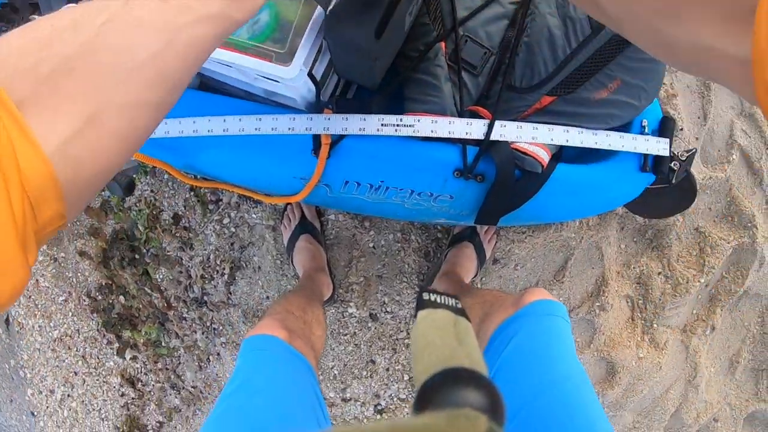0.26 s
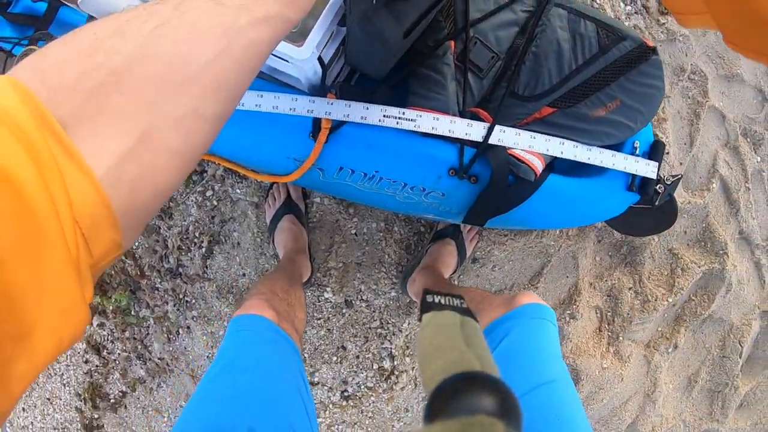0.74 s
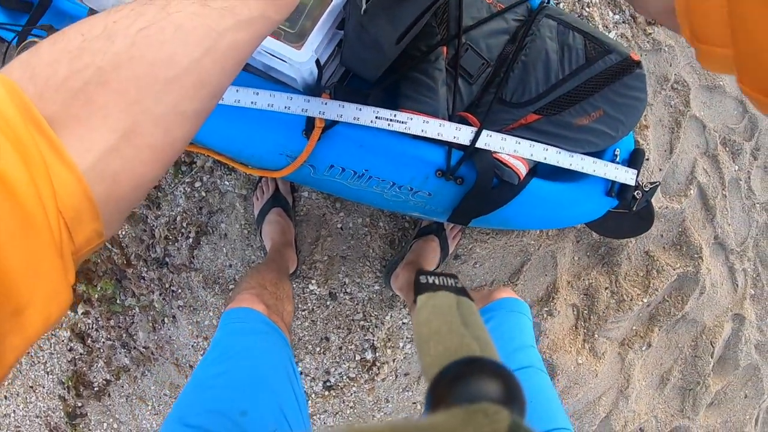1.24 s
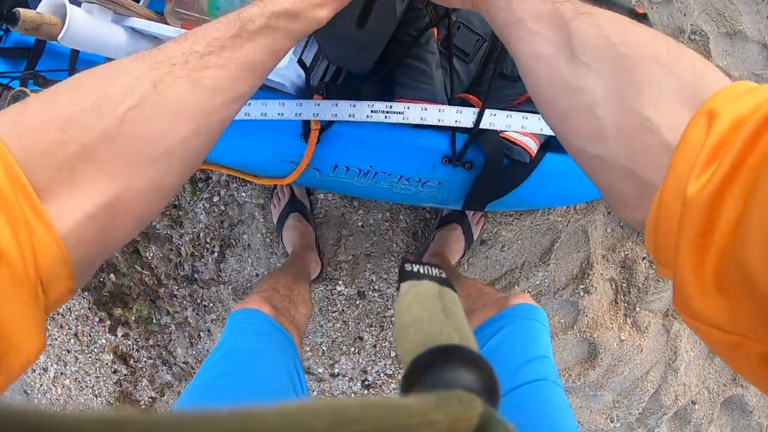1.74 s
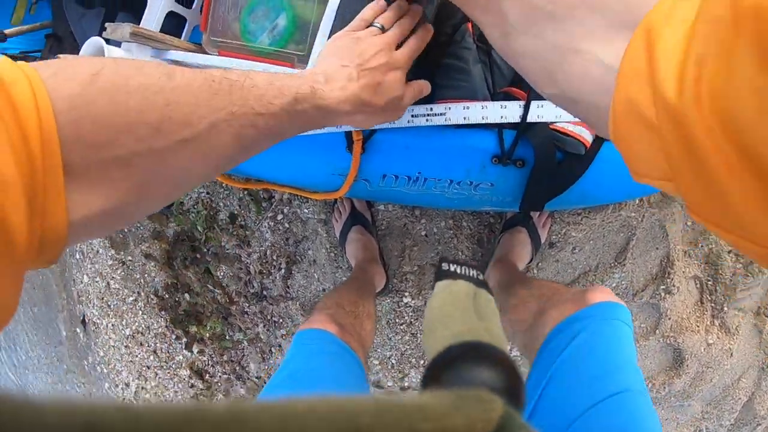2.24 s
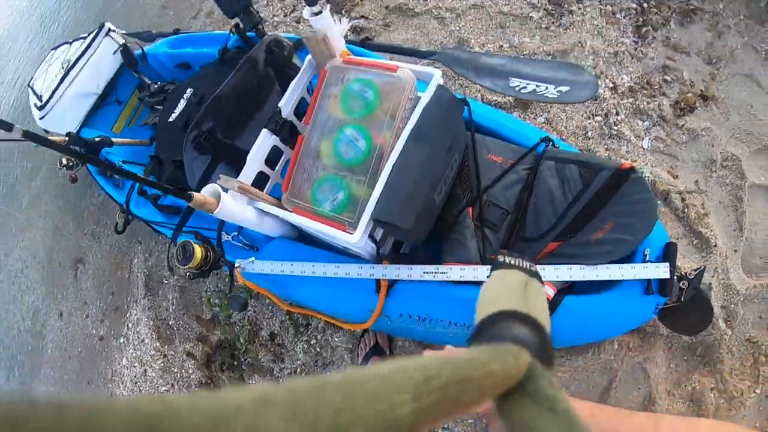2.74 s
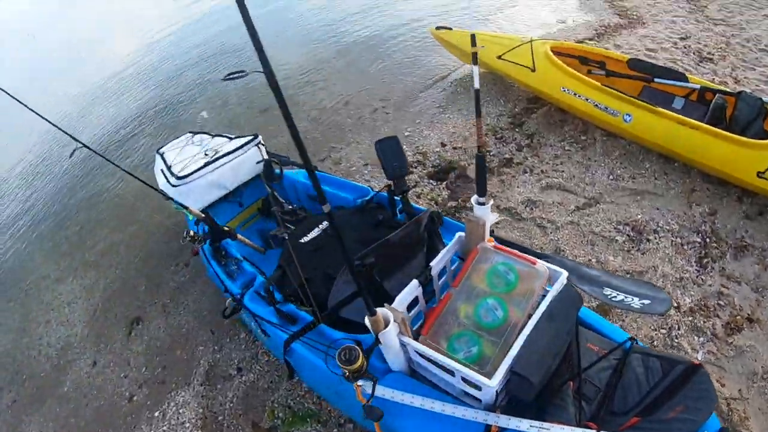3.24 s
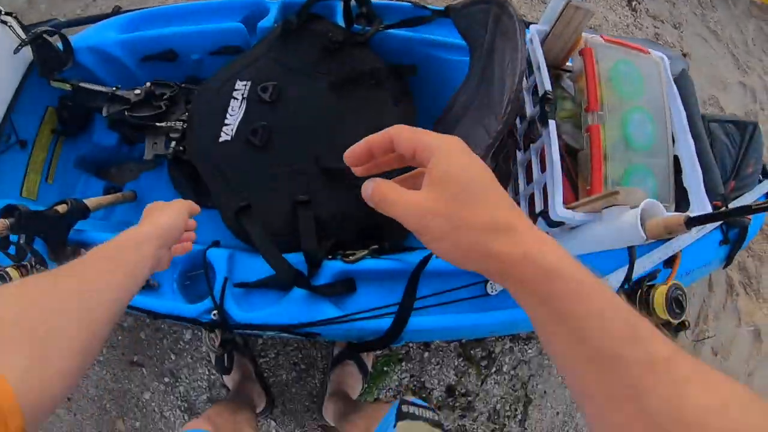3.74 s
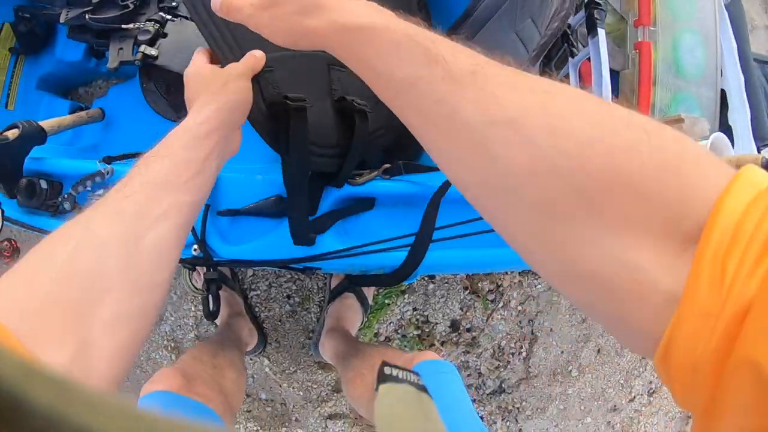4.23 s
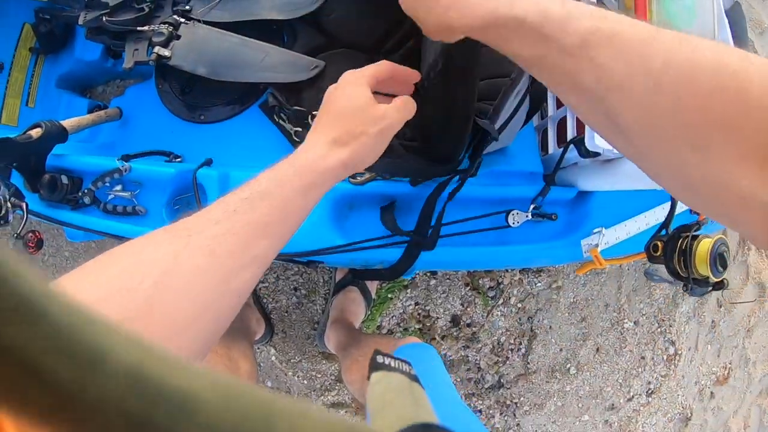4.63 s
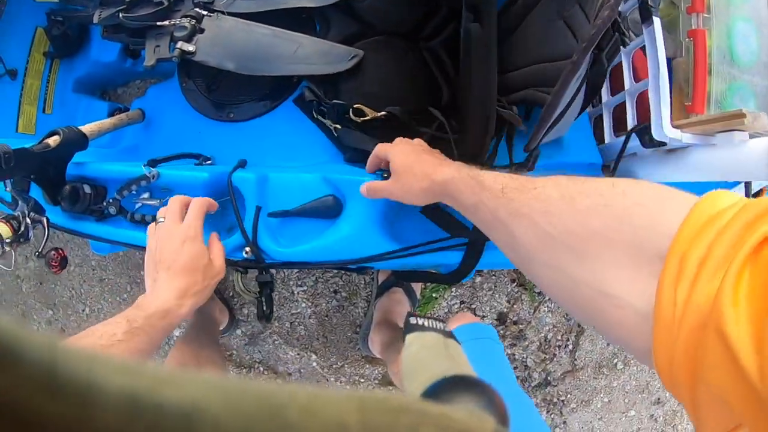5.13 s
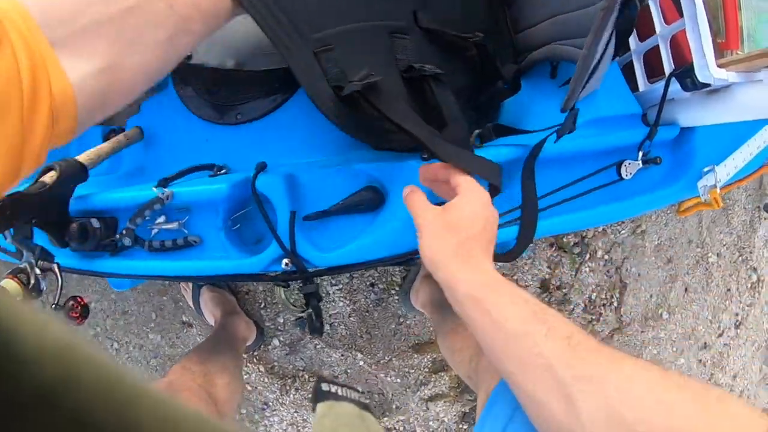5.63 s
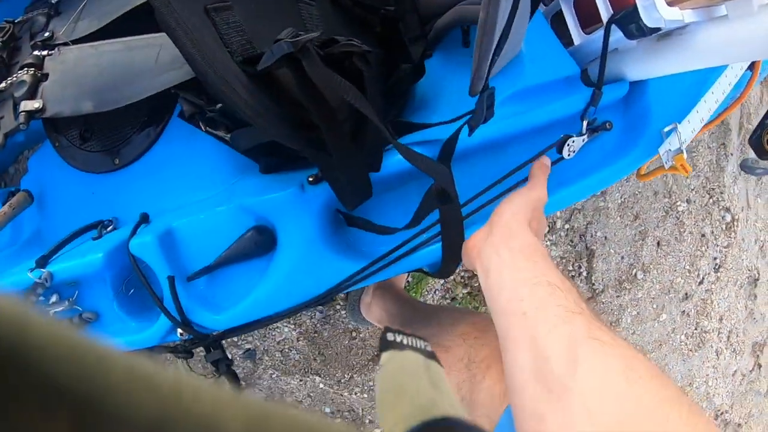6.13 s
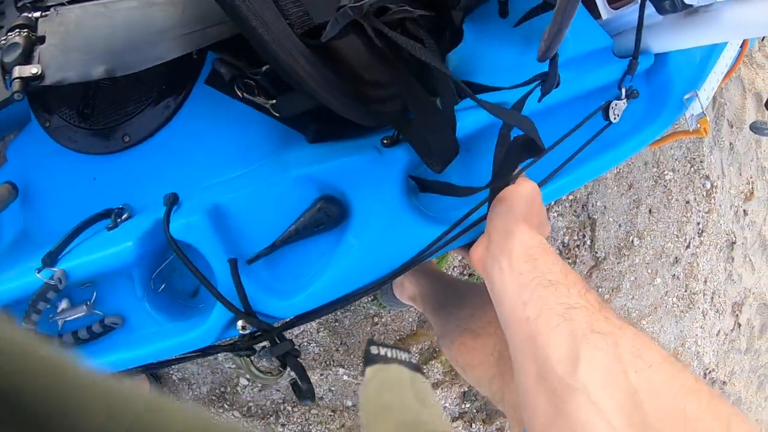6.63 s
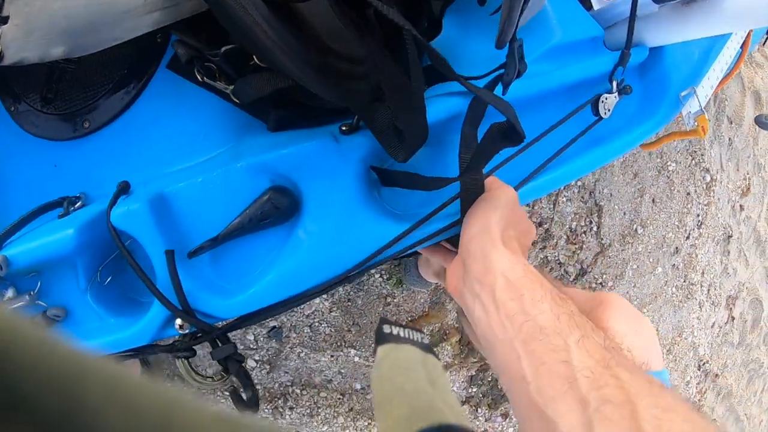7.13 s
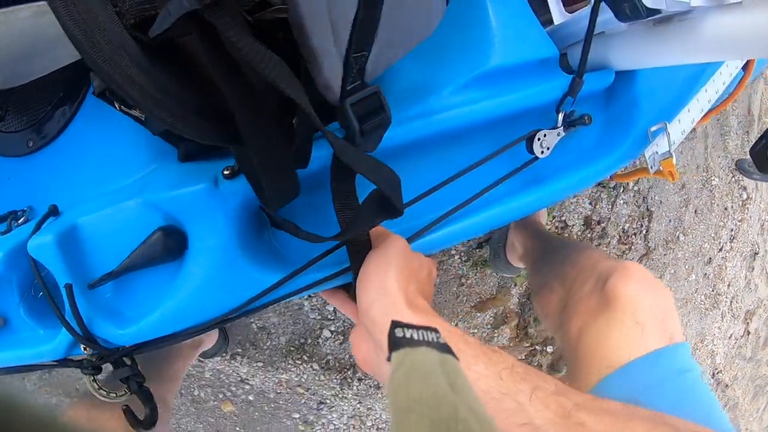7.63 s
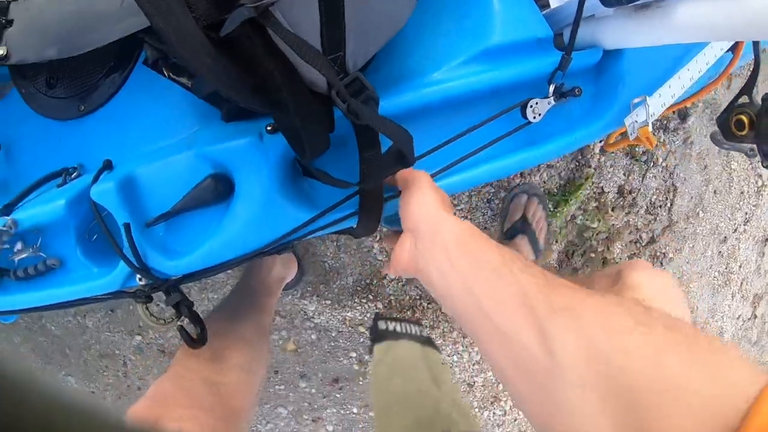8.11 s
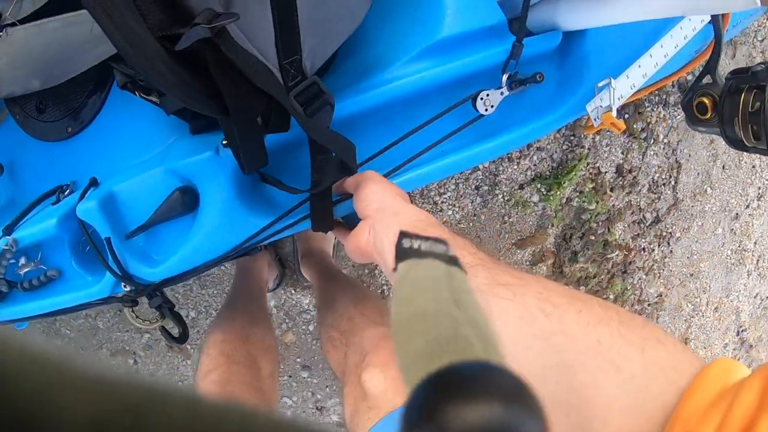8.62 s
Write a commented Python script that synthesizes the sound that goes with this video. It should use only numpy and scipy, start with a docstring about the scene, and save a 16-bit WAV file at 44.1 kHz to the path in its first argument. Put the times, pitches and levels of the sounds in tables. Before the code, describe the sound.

Outdoors by quiet water, a wearer's microphone catches hands rummaging with gear on a hollow plastic hull. Buckles tick, metal clips shake and ring, a hard knock lands, then things quieten with thin faint whistles. Bag cloth and straps rub and thump in the middle. Finally the boat drags over coarse sand with a booming, gritty scrape, ending in small rubs and a knock. Soft wind and shore hush underneath.

```python
"""A loaded plastic kayak on a gravelly beach, heard through a head-worn housing with two microphone ports.
From the start hands knock, snap and brush at hull and seat cloth (noise and damped modes); a strap creaks.
Around 1.2 s shaken metal clips jingle (ringing modes); thin whistles follow; from 3.5 to 6.9 s a far motor hums.
From 6.6 to 8.2 s the hull slides over sand (grainy noise through shell, deck and surface), then handling resumes.
Light wind and the hush of the shore (filtered noise) lie under it all."""
import sys
import numpy as np
from scipy import signal
from scipy.fft import rfft, irfft, next_fast_len
from scipy.io import wavfile
from scipy.ndimage import uniform_filter1d

SR = 44100
rng = np.random.default_rng(int(sys.argv[2]) if len(sys.argv) > 2 else 0)


def inscribe(sig):
    """Save sig as 16-bit PCM at rate SR to the path in sys.argv[1].

    A 1-D sig is mono; a 2-D sig holds one channel per row.
    Samples are clipped to [-1, 1] before scaling.
    """
    pcm = np.round(np.clip(np.atleast_2d(sig).T, -1, 1) * 32767)
    wavfile.write(sys.argv[1], SR, pcm.astype(np.int16))


N = 391166

# hull dragged over sand [t/s, level/dB, grain fineness 0 coarse .. 2 finest]
SLIDE = [(6.6, -53, 0.24), (6.756, -33, 0.84), (6.794, -28.5, 0.26), (7.064, -19, 0.39), (7.56, -19, 0.37),
         (7.568, -17.5, 0.27), (7.902, -20.5, 0.63), (7.96, -26, 0.38), (8.07, -45.5, 0.46),
         (8.16, -91, 0.3)]
SLIDE_BOOM_DB, SLIDE_DECK_DB, SLIDE_GRAINS_DB = -2, -7.5, -10.5  # added to the slide's level
# load never quite at rest [t/s, shell level/dB, surface level/dB, grain fineness 0..2]
STIR = [(0, -56, -57, 0.49), (.5, -55, -57, 0.88), (.9, -56, -54, 1.4), (1.3, -75, -50, 1.8),
        (1.5, -65, -55.5, 0.57), (1.59, -58, -65, 0.47), (1.7, -49, -59.5, 1.1), (2.07, -46, -59, 0.7),
        (2.5, -58, -49, 0.83), (2.8, -54.5, -55, 0.64), (3.55, -60.5, -51, 0.14), (4.3, -48.5, -55, 0.76),
        (4.63, -42.5, -62, 0.92), (4.72, -55, -68, 0.9), (5.1, -43, -41, 0.27), (5.6, -45, -54, 0.45),
        (5.78, -60, -44, 0.71), (6.4, -42.5, -48, 0.47), (6.7, -42.5, -49.5, 0.62), (8.1, -47, -52.5, 1.43),
        (8.5, -55, -52, 0.87), (8.87, -37, -51, 0.66)]
STIR_DECK_DB = -13.5  # added to the shell level
# gear and hands scraping the hull, through the shell [peak t/s, rise/s, fall/s, boom level/dB, deck level/dB]
SCRAPES = [(0.005, .03, 0.016, -36, -51), (.136, 0.18, 0.018, -42.5, -58), (.3, 0.39, 0.09, -48.5, -57),
           (.43, 0.21, 0.027, -46.5, -47.5), (.55, 0.037, 0.41, -39.5, -60), (.95, 0.072, 0.53, -43, -71),
           (1.205, 0.01, 0.089, -35.5, -43), (1.365, 0.0069, 0.091, -39, -63),
           (1.515, 0.033, 0.18, -37, -60), (1.65, 0.059, 0.04, -38.5, -65), (1.76, 0.054, 0.16, -40, -51),
           (1.95, 0.085, 0.39, -39.5, -50.5), (2.2, 0.079, 0.28, -44, -50),
           (2.354, 0.083, 0.066, -34.5, -67), (2.6, 0.42, 0.19, -44.5, -54.5),
           (2.78, 0.067, 0.09, -51, -61), (3.33, 0.11, 0.17, -55, -57), (3.7, 0.052, 0.42, -44, -51.5),
           (4.246, 0.053, 0.024, -39, -45), (4.376, 0.047, 0.084, -35, -33.5),
           (4.522, 0.073, 0.082, -31.5, -31), (4.58, 0.023, 0.027, -30.5, -48),
           (4.71, 0.14, 0.23, -41.5, -66), (4.87, 0.048, 0.093, -34.5, -41), (5.03, 0.1, 1, -57, -45.5),
           (5.33, 0.078, 0.069, -34, -43), (5.46, 0.036, 0.11, -34, -36), (5.58, 0.1, 0.25, -37.5, -45),
           (5.941, 0.031, 0.04, -32, -35.5), (6.07, 0.35, 0.14, -40.5, -44), (6.5, 0.058, 0.07, -34, -39),
           (6.58, 0.065, 0.027, -38, -46), (8.01, 0.041, 0.03, -26, -62), (8.27, 0.2, 0.044, -48.5, -53.5),
           (8.38, 0.041, 0.086, -39.5, -46), (8.54, 0.019, 0.2, -41.5, -54),
           (8.745, 0.058, 0.073, -28, -38)]
# cloth, straps, feet sweeping past, heard directly [peak t/s, rise/s, fall/s, level/dB, grain fineness from 0]
SWEEPS = [(.125, 0.035, 0.023, -51.5, 1.5), (.41, 0.18, 0.14, -50.5, 0.91), (.57, 0.072, 0.22, -52, 1),
          (.75, 0.046, 0.23, -45.5, 0.14), (1.02, 0.04, 0.013, -32.5, 1.1), (1.1, 0.19, 0.1, -44, 1.2),
          (1.23, 0.026, 0.035, -31.5, 1.5), (1.44, 0.034, 0.017, -42, 1.8),
          (1.638, 0.021, 0.034, -43, 0.17), (1.88, 0.29, 0.16, -52, 0.13), (2.0, 0.11, 0.22, -49, 0.83),
          (2.2, 0.046, 0.094, -50.5, 0.61), (2.33, 0.085, 0.039, -49.5, 0.88),
          (2.46, 0.11, 0.1, -41.5, 1.26), (2.58, 0.13, 0.075, -43, 1.1), (3.08, 0.068, 0.085, -56.5, 1.9),
          (3.41, 0.21, 0.052, -43, 0.6), (3.71, 0.061, 0.098, -29, 0.72), (3.89, 0.12, 0.053, -46, 0.96),
          (4.31, 0.033, 0.34, -49.5, 0.1), (4.426, 0.008, 0.095, -37, 0.31),
          (4.508, 0.12, 0.091, -31.5, 0.12), (4.68, 0.018, 0.03, -40.5, 0.62),
          (4.769, 0.11, 0.021, -42, 0.88), (4.84, 0.079, 0.41, -42, 0.9), (5.05, 0.092, 0.083, -36, 0.71),
          (5.33, 0.12, 0.041, -43, 0.089), (5.49, 0.14, 0.14, -38, 0.52), (5.58, 0.022, 0.033, -29, 0.63),
          (5.7, 0.23, 0.044, -41.5, 0.57), (5.83, 0.027, 0.33, -44, 0.9), (6.25, 0.12, 0.078, -38, 0.15),
          (6.36, 0.11, 0.021, -42, 0.16), (6.49, 0.07, 0.061, -46.5, 0.42), (6.59, 0.037, 0.04, -39.5, 0.1),
          (8.05, 0.12, 0.04, -38, 1.1), (8.18, 0.14, 0.23, -39.5, 3.3), (8.37, 0.023, 0.2, -45, 1.2),
          (8.5, 0.12, 0.12, -43, 0.91), (8.75, 0.13, 0.06, -44.5, 0.65), (8.831, 0.012, 0.015, -39.5, 0.17)]
# boom of the hollow shell [f/Hz, level/dB per Hz]
HULL_BOOM = [(29, -41), (50, -9), (108, -2.5), (140, -6), (211, -3.5), (296, -5.5), (480, -13), (620, -37),
             (1060, -120)]
# stiffer deck panels [f/Hz, level/dB per Hz]
DECK_PANELS = [(250, -6), (430, -3), (590, 4), (668, 0), (852, -6), (1030, -3.5), (1150, -5.5), (1500, -17),
               (2530, -120)]
# coarse sand and cloth [f/Hz, level/dB per Hz]
COARSE_GRAINS = [(620, -10), (1050, 6), (1170, 4), (1530, 6), (1850, 2.5), (2020, 3.5), (2400, -7.5),
                 (2600, -24), (3380, -100)]
# finer grains [f/Hz, level/dB per Hz]
FINE_GRAINS = [(1470, -21), (2500, -5.5), (3130, -4), (4900, -17), (6370, -22.5), (10800, -120)]
# finest grains [f/Hz, level/dB per Hz]
FINEST_GRAINS = [(2530, -19), (4300, -8.5), (5220, -6), (8800, -8.5), (10400, -8.5), (11100, -15.5),
                 (12000, -10.5), (13900, -15.5), (15400, -22), (16200, -65)]
# loaded keel's colour on the slide [f/Hz, gain/dB]
KEEL = [(100, 2), (690, -2), (850, 5), (1100, -1), (1530, 1), (1800, 1.5), (2400, -2), (3000, -0.5),
        (5500, -1), (16000, 0.5)]
GRAIN_SPREAD_DB = 5.5  # loss one grain size away from the fineness


def rubbing():
    """Stick and slip: slow jolts sound in shell and deck, small grains hiss."""
    t = np.arange(N) / SR
    outside_s = np.maximum(np.maximum(SLIDE[0][0] - t, t - SLIDE[-1][0]), 0)
    slide_db = along(SLIDE, 1) - 200 * outside_s
    shell_db, surface_db = along(STIR, 1), along(STIR, 2)
    scrapes, sweeps = np.array(SCRAPES), np.array(SWEEPS)

    drag = grains(per_s=130, spread_db=0.86, grain_s=0.017, steady=0.64)
    boom = evened(colour(drag, HULL_BOOM)) * amp(slide_db + SLIDE_BOOM_DB)
    # a loose load knocks more than it drags
    bumps = grains(per_s=70, spread_db=3.8, grain_s=0.017, steady=0.3)
    boom = boom + evened(colour(bumps, HULL_BOOM)) * pressure([shell_db], scrapes, scrapes[:, 3])

    jolts = grains(per_s=200, spread_db=2.8, grain_s=0.004, steady=1.3)
    panels = evened(colour(patchy(jolts, 1.6), DECK_PANELS))
    deck = panels * pressure([shell_db + STIR_DECK_DB], scrapes, scrapes[:, 4])
    dragged = panels * amp(slide_db + SLIDE_DECK_DB)

    sand = patchy(grains(per_s=600, spread_db=2.7, grain_s=0.0018, steady=1.1), 1.9)
    hiss = 0
    for size, spectrum in enumerate([COARSE_GRAINS, FINE_GRAINS, FINEST_GRAINS]):
        sifted = evened(colour(sand, spectrum))
        stir_db = surface_db + size_loss_db(size, along(STIR, 3))
        sweep_db = sweeps[:, 3] + size_loss_db(size, sweeps[:, 4])
        hiss = hiss + sifted * pressure([stir_db], sweeps, sweep_db)
        slid_db = slide_db + SLIDE_GRAINS_DB + size_loss_db(size, along(SLIDE, 2))
        dragged = dragged + sifted * amp(slid_db)
    return boom + deck + hiss + colour(dragged, KEEL)


def size_loss_db(size, fineness):
    """A grain size sounds weaker the further it lies from the wanted fineness."""
    return -GRAIN_SPREAD_DB * (size - fineness) ** 2


def pressure(steady_db, strokes, levels_db):
    """Gain over time of one layer: steady parts and strokes add in power."""
    power = np.zeros((1, N + SR))  # half a second of margin at each end
    for (peak_s, rise_s, fall_s), db in zip(strokes[:, :3], levels_db):
        add(power, peak_s, (amp(db) * stroke(rise_s, fall_s)) ** 2)
    steady = sum(amp(db) ** 2 for db in steady_db)
    return np.sqrt(power[0, SR // 2:N + SR // 2] + steady)


def stroke(rise_s, fall_s):
    """Swells to a rounded peak and dies away, 20 dB down after the rise or fall time."""
    late_s = np.arange(-SR // 2, SR // 2) / SR
    return amp(-20 * abs(late_s / np.where(late_s < 0, rise_s, fall_s)) ** 1.54)


def grains(per_s, spread_db, grain_s, steady):
    """Noise in short puffs of uneven size over a steady part; both channels share the puffs."""
    sizes = amp(spread_db * np.minimum(rng.exponential(1, N), 5))
    hits = sizes * (rng.random(N) < per_s / SR)
    fall = np.exp(-1 / (grain_s * SR))
    puffs = evened(np.sqrt(signal.lfilter([1], [1, -fall], hits ** 2)))
    return (steady + puffs) * rng.standard_normal((2, N))


def patchy(pair, depth_db):
    """Contact points wander, so narrow bands swell and fade for a moment."""
    z = signal.stft(pair, nperseg=512, noverlap=384)[2]
    patches = uniform_filter1d(rng.standard_normal(z.shape[1:]), size=3, axis=0)
    patches = uniform_filter1d(patches, size=30, axis=1)
    return signal.istft(z * amp(depth_db * evened(patches)), nperseg=512, noverlap=384)[1][:, :N]


# blows on the shell [t/s, level/dB, base f/Hz]
THUDS = [(0.131, -35, 315), (0.282, -34.5, 340), (0.535, -32.5, 317), (0.841, -23, 375), (0.847, -27, 166),
         (1.015, -36, 358), (1.198, -29, 366), (1.369, -32.5, 203), (1.538, -18, 307), (1.639, -32, 292),
         (1.856, -32, 340), (1.967, -28, 228), (2.305, -26.5, 250), (2.351, -34.5, 314),
         (2.445, -34.5, 189), (2.608, -20, 331), (4.24, -36.5, 325), (4.336, -37, 149), (4.472, -30, 260),
         (4.518, -22.5, 243), (4.53, -28, 405), (4.733, -30, 356), (4.832, -30, 237), (4.865, -31, 316),
         (4.902, -34, 282), (5.276, -29, 300), (5.316, -35, 220), (5.333, -32, 230), (5.363, -32, 306),
         (5.455, -19.5, 242), (5.466, -29.5, 333), (5.519, -32, 315), (5.6, -35, 251), (5.922, -31.5, 490),
         (6.002, -27, 149), (6.025, -32, 570), (6.083, -30.5, 507), (6.11, -37, 780), (6.492, -24.5, 148),
         (8.073, -32, 292), (8.537, -34, 282), (8.744, -28, 145), (8.823, -38, 239)]
# shell modes [ratio to base f, level/dB]
SHELL_MODES = [(0.649, -1.5), (0.999, 10.5), (1.55, -11.5), (2.3, -0.5), (3.3, -3.5)]


def thuds():
    """Each blow rings the damped modes of the plastic shell; higher modes die sooner."""
    out, t = np.zeros((2, N)), np.arange(SR // 5) / SR
    chance = rng.random((len(THUDS), len(SHELL_MODES), 2))
    for (s, db, base_hz), luck in zip(THUDS, chance):
        ring = 0
        for (ratio, mode_db), (detune, phase) in zip(SHELL_MODES, luck):
            hz = base_hz * ratio * (0.893 + 0.22 * detune)
            t60_s = 0.039 * (250 / hz) ** 0.4
            ring = ring + amp(mode_db - 60 * t / t60_s) * np.sin(2 * np.pi * (hz * t + 0.59 * phase))
        add(out, s, amp(db) * ring * (1 - np.exp(-t / 0.0019)))
    return out


# snaps of buckles, straps, pebbles [t/s, peak level/dB, centre f/Hz]
SNAPS = [(0.112, -29.5, 1260), (0.128, -28, 1380), (0.2727, -14.5, 7700), (.2822, -21, 8000),
         (0.294, -26, 7000), (0.324, -25, 8520), (0.359, -29, 8800), (0.405, -20.5, 9000),
         (0.414, -21.5, 8820), (0.524, -34, 8930), (0.56, -28, 7450), (0.591, -27, 8830),
         (0.737, -24, 2860), (0.748, -22, 7700), (0.793, -27, 3040), (0.812, -29, 2610), (0.8419, -9, 1830),
         (0.855, -23, 2440), (0.908, -31, 8860), (0.963, -28, 1300), (1.017, -17, 1550),
         (1.018, -12.5, 5470), (1.058, -21, 2300), (1.087, -20.5, 2210), (1.233, -14, 5000),
         (1.251, -8.5, 13500), (1.364, -22.5, 1300), (1.439, -25, 3750), (1.534, -15.5, 1500),
         (1.538, -6, 3670), (1.627, -26, 2440), (1.789, -37, 2270), (1.8, -38, 3150), (1.814, -35, 1300),
         (1.832, -30.5, 9000), (1.858, -31, 750), (2.305, -29.5, 1820), (2.323, -26, 2450),
         (2.603, -34, 830), (2.898, -30, 1490), (2.935, -33.5, 1430), (3.202, -32, 2100),
         (3.244, -34, 2000), (3.326, -24.5, 2190), (3.338, -26, 2200), (3.367, -42, 1100),
         (4.018, -34, 1540), (4.051, -31, 3600), (4.128, -45, 5500), (4.148, -24, 3020), (4.243, -31, 755),
         (4.244, -21.5, 4430), (4.295, -28, 1420), (4.311, -34, 4000), (4.339, -27, 1480),
         (4.374, -33, 680), (4.421, -30, 1290), (4.531, -15, 1200), (4.55, -20, 600), (4.575, -20, 640),
         (4.583, -21, 634), (4.651, -33, 1960), (4.734, -16.5, 1210), (4.745, -21.5, 584),
         (4.802, -32.5, 650), (4.831, -26.5, 970), (4.879, -18, 626), (4.909, -28, 886), (5.319, -23, 738),
         (5.441, -28.5, 450), (5.457, -17.5, 473), (5.553, -31, 950), (5.7, -32, 550), (5.456, -18, 735),
         (5.464, -18.5, 710), (5.949, -29, 1120), (5.95, -29, 5000), (6.025, -31, 703), (6.083, -29, 950),
         (6.487, -24, 890), (8.173, -28, 1740), (8.215, -33, 1500), (8.299, -36, 2190),
         (8.354, -27.5, 3400), (8.185, -21, 8850), (8.827, -35, 746)]


def snaps():
    """A sharp tick with a puff of grit through a broad resonance; duller snaps last longer."""
    out, t = np.zeros((2, N)), np.arange(SR // 10) / SR
    noise = rng.standard_normal((len(SNAPS), 2, len(t)))
    for (s, db, hz), grit in zip(SNAPS, noise):
        t60_s = 0.024 * (2000 / hz) ** 0.4
        drive = grit * amp(-60 * t / t60_s) + 4.5 * (t == 0)
        tone = hump(drive, hz, 0.95) + 0.0097 * drive
        add(out, s, amp(db) * tone / abs(tone[0]).max())
    return out


# brushes with a sharp start [t/s, length/s, level/dB, centre f/Hz, width/octaves]
BRUSHES = [(0.204, 0.0081, -38, 6000, 3.6), (0.207, 0.11, -35, 7300, 3.1), (0.42, 0.023, -39.5, 8000, 2.4),
           (1.915, .12, -46.5, 740, .4), (1.982, 0.11, -51, 3920, 0.12), (2.427, 0.13, -36.5, 3030, 0.43),
           (3.663, 0.14, -32.5, 2760, 1.17), (4.462, 0.073, -30.5, 2290, .9),
           (4.659, 0.063, -45, 2480, 1.5), (4.989, 0.18, -35, 4000, 0.48), (5.153, 0.085, -40, 3800, 0.38),
           (5.561, 0.055, -32.5, 2950, 3.8), (5.816, 0.067, -36, 3270, .25), (7.157, 0.032, -29, 3140, .4),
           (8.033, 0.067, -38.5, 8000, 1.1), (8.353, 0.09, -38, 1510, .3), (8.354, 0.088, -37.5, 2060, .3)]


def brushes():
    """Cloth or sand swept for an instant: grainy noise through a resonance."""
    out = np.zeros((2, N))
    sweep = patchy(grains(per_s=600, spread_db=2.5, grain_s=0.002, steady=1.2), 3.0)
    for s, length_s, db, hz, octaves in BRUSHES:
        noise = sweep[:, round(s * SR):round((s + length_s) * SR)]
        u = np.linspace(0, 1, noise.shape[1])
        envelope = np.minimum(u * length_s / 0.002, 1) * (1 - u ** 3)
        add(out, s, amp(db) * evened(hump(noise, hz, octaves)) * envelope)
    return out


# strap creaking through a buckle [t/s, level/dB, first gap/s, gap growth per slip, loss per slip from the third/dB]
CREAKS = [(.2175, -12.5, .0037, 1.25, 2.6)]


def creaks():
    """Slips that slow down, swell and fade, each a bright tick."""
    out, t, k = np.zeros((2, N)), np.arange(200) / SR, np.arange(7)
    for s, db, gap_s, growth, fade_db in CREAKS:
        slips_s = s + gap_s * (growth ** k - 1) / (growth - 1)
        for slip_s, slip_db in zip(slips_s, db - fade_db * abs(k - 2)):
            drive = amp(-60 * t / 0.004) * rng.standard_normal((2, 200)) + 4 * (t == 0)
            add(out, slip_s, amp(slip_db) * hump(drive, 7000, 1.3))
    return out


# how hard the clips are shaken [t/s, level/dB]
SHAKE = [(0.9, -38), (0.93, -29.5), (0.972, -36.5), (0.984, -32), (1.078, -30.5), (1.26, -20),
         (1.276, -29.5), (1.444, -38), (1.46, -56)]


def shaking():
    """Strength of the shake over time, silent outside 0.91 to 1.45 s."""
    return amp(along(SHAKE, 1)) * (abs(np.arange(N) / SR - 1.18) < 0.27)


# metal clip modes [f/Hz, level/dB, t60/s]
CLIP_MODES = [(2450, 1, 0.044), (3273, -5, 0.055), (4070, -10, .05), (5012, -14, 0.16), (5760, -13, .05),
              (6223, -11, 0.062), (6751, 0, 0.1), (7205, -5, 0.073), (7704, -12, 0.099), (8409, -3.5, 0.16),
              (8823, 0, 0.061), (8926, 0.5, 0.058), (10230, -5, 0.19), (10620, -2, 0.08),
              (11356, -11, 0.077), (11746, -2, 0.056), (12150, -7, 0.06), (12650, -1, .07),
              (13146, -5, .05), (13765, -2, 0.06), (13990, -3, 0.046), (14750, -1, 0.065),
              (15057, 8, 0.052), (15200, 4, .06), (15560, 6, .05)]
# single clinks [t/s, level/dB, ringing f/Hz]
CLINKS = [(.423, -29, 8930), (0.589, -35.5, 8823), (.925, -27, 8823), (.928, -28, 13765), (.962, -40, 5012),
          (1.06, -31, 6223), (1.088, -27, 11356), (1.09, -32, 12650), (.984, -23, 7205), (.98, -36, 8409),
          (1.047, -29, 11356), (1.047, -29, 11746), (1.13, -27, 7205), (1.147, -19.5, 8926),
          (1.15, -23, 3273), (1.186, -22, 6223), (1.187, -22, 10230), (1.187, -32, 14750),
          (1.197, -29, 12150), (1.203, -29, 7704), (1.203, -31, 15057), (1.205, -34, 13765),
          (1.208, -34, 11746), (1.228, -26, 7704), (1.251, -33, 13146), (1.25, -27, 15057),
          (1.203, -26, 10230), (1.215, -32, 8409), (1.249, -12, 8823), (1.256, -19.5, 3273),
          (1.263, -37, 5012), (1.272, -29, 7205), (1.265, -34, 10620), (1.33, -24.5, 7205),
          (1.342, -30.5, 8409), (1.332, -23, 10620), (1.33, -32, 6751), (1.342, -32, 9700),
          (1.352, -36, 5012), (1.398, -31, 11356), (1.405, -30, 6751), (6.027, -37, 6223),
          (8.115, -39, 8823)]


def clips():
    """Shaken clips strike at random; each touch rings one mode, and single clinks beat as the pieces swing."""
    out, t = np.zeros((2, N)), np.arange(SR // 4) / SR
    shake = shaking() * amp(-1.5)
    for hz, db, t60_s in CLIP_MODES:
        touches = (rng.random(N) < 35 / SR) * amp(-14.0 * rng.random(N)) * shake
        ring = amp(db - 60 * t / t60_s) * np.sin(2 * np.pi * (hz * t + 0.6 * rng.random((2, 1))))
        out += signal.oaconvolve(touches[None], ring, axes=1)[:, :N]
    decays = [(f, t60_s) for f, _, t60_s in CLIP_MODES]
    for s, db, hz in CLINKS:
        swing = 1 + 0.5 * np.sin(2 * np.pi * (rng.uniform(30, 90) * t + rng.random((2, 1))))
        ring = np.sin(2 * np.pi * (hz * t + 0.6 * rng.random((2, 1)))) * (1 - np.exp(-t / 0.001))
        add(out, s, amp(db - 60 * t / read(decays, hz)) * swing * ring)
    # touching pieces damp one another
    return out * (1 + 0.4 * evened(uniform_filter1d(rng.standard_normal(N), size=300)))


def rattle():
    """Loose tackle ticks and chinks against the plastic while the clips are shaken."""
    ticks = evened(hump(grains(per_s=120, spread_db=3.6, grain_s=0.002, steady=0.08), 3000, 3))
    chinks = pebbles(per_s=600, low_hz=1500, high_hz=6500, cycles=16, spread_db=2.2)
    return (amp(-10.0) * ticks + amp(-16.0) * chinks) * shaking()


def pebbles(per_s, low_hz, high_hz, cycles, spread_db):
    """Loose small parts at 24 pitches, each ringing down by 1/e in the given cycles."""
    out, t = np.zeros((2, N)), np.arange(1500) / SR
    for hz in np.geomspace(low_hz, high_hz, 24) * rng.uniform(0.95, 1.05, 24):
        sizes = amp(spread_db * np.minimum(rng.exponential(1, N), 4))
        hits = sizes * (rng.random(N) < per_s / 24 / SR)
        ring = np.exp(-t * hz / cycles) * np.sin(2 * np.pi * (hz * t + rng.random((2, 1))))
        out += signal.oaconvolve(hits[None], ring / np.linalg.norm(ring[0]), axes=1)[:, :N]
    return evened(out)


# faint thin whistles, perhaps far birds or squeaking straps [t/s, length/s, level/dB, start f/Hz, end f/Hz]
WHISTLES = [(1.56, .17, -66, 7400, 7460), (1.79, .22, -54, 3170, 3100), (1.834, .15, -51, 3745, 3700),
            (1.96, .15, -53, 3720, 3780), (2.221, .055, -57, 5400, 5300), (2.345, .12, -50, 3680, 3620),
            (2.749, .021, -52, 2930, 2830), (2.76, .2, -58, 1260, 1256), (3.02, .24, -57, 1290, 1230)]


def whistles():
    """Gliding near-sines that waver in pitch and strength."""
    out = np.zeros((2, N))
    for s, length_s, db, start_hz, end_hz in WHISTLES:
        hz = np.linspace(start_hz, end_hz, round(length_s * SR))
        hz = hz + 16 * evened(uniform_filter1d(rng.standard_normal(len(hz)), size=400))
        broken = 1 + 0.25 * evened(uniform_filter1d(rng.standard_normal(len(hz)), size=500))
        tone = np.sin(2 * np.pi * np.cumsum(hz) / SR)
        add(out, s, amp(db) * broken * tone * signal.windows.tukey(len(hz), 0.4))
    return out


# wind strength [t/s, level/dB]
WIND = [(0.0, -47), (1.88, -54.5), (2.0, -48.5), (2.99, -47.5), (3.29, -35.5), (3.8, -42), (4.62, -43),
        (4.84, -50), (6.17, -41.5), (6.45, -42), (7.16, -51), (7.98, -70), (8.05, -43), (8.45, -53),
        (8.87, -53)]
# wind spectrum [f/Hz, level/dB per Hz]
GUST = [(11, -32), (18, -14), (54, -1), (89, 2), (142, -7), (178, -14.5), (199, -14), (260, -42),
        (340, -72)]


def wind():
    """Lumpy low noise, partly opposed between the ports."""
    gusts = evened(colour(grains(per_s=30, spread_db=3.5, grain_s=0.031, steady=1.8), GUST))
    flutter = colour(gusts[1], [(1, -1), (40, -2), (85, -9), (180, -30)])
    return (gusts[0] + flutter * np.array([[1], [-1]])) * amp(along(WIND, 1))


# far motor [t/s, level/dB]
MOTOR = [(3.5, -62), (3.75, -45), (4.62, -40), (4.78, -47.5), (5.21, -37), (6.36, -43.5), (6.9, -36)]
MOTOR_HZ = 132.4


def motor():
    """A single far hum, gently wavering in level, faded in and out."""
    t = np.arange(N) / SR
    waver = 1 + 3.4 * uniform_filter1d(rng.standard_normal(N), size=4000)
    fade = np.clip(np.minimum(t - MOTOR[0][0], MOTOR[-1][0] - t) / 0.22, 0, 1)
    return amp(along(MOTOR, 1)) * waver * fade * np.sin(2 * np.pi * MOTOR_HZ * t)


# hush of the shore [f/Hz, level/dB per Hz]
SHORE = [(59, -31), (100, -5), (143, 14), (461, -34), (818, -31), (1080, -33.5), (1280, -40), (1680, -27),
         (3190, -64), (5900, -17), (8460, -22), (14100, -65), (16000, -78)]
SHORE_DB = -57


def shore():
    """Steady coloured noise whose narrow bands swell and fade."""
    hush = patchy(rng.standard_normal((2, N)), 1.5)
    return ports(evened(colour(hush, SHORE))) * amp(SHORE_DB)


# spectrum of the port difference, relative to the sum and before the shares below [f/Hz, gain/dB]
WIDTH = [(60, -35.5), (110, -47), (200, -13), (380, -4.5), (700, 12), (1290, 17.5), (2380, 8), (4400, 8),
         (8120, 17), (15000, 12.5)]
# phase lead of the difference over the sum [f/Hz, lead/rad]
TURN = [(700, 1.67), (1000, 1.04), (1250, -0.81), (1600, -0.47), (2400, -0.73), (5000, 1.15), (8500, 1.55)]


def ports(pair):
    """Left and right: the housing turns the phase between the ports, and each hears partly unlike grains."""
    size = next_fast_len(N, True)
    lead = np.exp(1j * read(TURN, np.fft.rfftfreq(size, 1 / SR)))
    turned = irfft(rfft(pair[0], size) * lead, size)[:N]
    width = [(1, WIDTH[0][1])] + list(WIDTH) + [(SR, WIDTH[-1][1])]
    side = colour(0.12 * pair[1] + 0.098 * turned, width)
    return np.array([pair[0] + side, pair[0] - side])


def amp(db):
    """dB to amplitude."""
    return 10 ** (np.asarray(db) / 20)


def evened(x):
    """Scales to unit RMS."""
    return x / np.sqrt(np.mean(x ** 2) + 1e-20)


def read(points, hz):
    """Reads a curve on a log frequency axis."""
    f, value = np.transpose(points)
    return np.interp(np.log(hz + 1), np.log(f + 1), value)


def along(table, column):
    """One column of a timed table at every sample."""
    rows = np.array(table)
    return np.interp(np.arange(N) / SR, rows[:, 0], rows[:, column])


def colour(x, points):
    """Filters by a spectrum that falls 4.2 dB more per octave past its ends."""
    size = next_fast_len(x.shape[-1], True)
    hz = np.fft.rfftfreq(size, 1 / SR)
    below = np.maximum(np.log2(points[0][0] / (hz + 1)), 0)
    above = np.maximum(np.log2((hz + 1) / points[-1][0]), 0)
    gain = amp(read(points, hz) - 4.2 * (below + above))
    return irfft(rfft(x, size) * gain, size)[..., :x.shape[-1]]


def hump(pair, hz, octaves):
    """A broad causal resonance, passed twice."""
    b, a = signal.iirpeak(np.clip(hz, 100, 15000), 1 / np.clip(octaves, 0.1, 3), SR)
    return signal.lfilter(b, a, signal.lfilter(b, a, pair))


def add(mix, s, sound):
    """Adds a sound at a time in seconds, cut at the end of the mix."""
    part = mix[:, round(s * SR):][:, :sound.shape[-1]]
    part += sound[..., :part.shape[1]]


# side of the boat as the head turns [t/s, left minus right/dB]
SIDE_OF_BOAT = [(0.0, 0.5), (0.76, -1), (1.6, 0.5), (3.43, -6.5), (3.51, -4), (4.47, 0), (5.06, -4.5),
                (5.88, -1), (6.25, -5), (7.34, -0.5), (8.25, -3.5), (8.87, -2.5)]


def scene():
    """Boat sounds lean left or right above the lows; thuds, whistles and background do not."""
    lean_db = along(SIDE_OF_BOAT, 1) / 2
    boat = ports(rubbing() + snaps() + creaks() + brushes() + rattle())
    boat = boat + clips() * amp([[1.5], [-1.5]])
    low = colour(boat, [(1, 0), (500, 0), (900, -30)])  # long waves reach both ports alike
    leaning = (boat - low) * amp([lean_db, -lean_db])
    return low + leaning + thuds() + whistles() + wind() + motor() + shore()


# housing's colour on all it hears [f/Hz, gain/dB]
HOUSING = [(850, 0), (1060, -8.5), (1300, -1), (1700, -2.5), (6000, -1.5), (8800, 5.5), (10000, -3.5),
           (11200, -5.5), (15000, -12.5)]
EDGE_HZ = 15900


def record(dry):
    """Gain dips just after sharp loud hits; housing colour, soft limiter and band limit follow."""
    power = (dry ** 2).mean(0)
    quick_db = 10 * np.log10(abs(uniform_filter1d(power, 200)) + 1e-12)
    slow_db = 10 * np.log10(abs(uniform_filter1d(power, 12000)) + 1e-12)
    over_db = np.maximum(quick_db - slow_db - 4.5, 0)
    fall_db = np.arange(N) * 31.0 / SR  # the held excess falls 31 dB a second
    held_db = np.maximum.accumulate(over_db + fall_db) - fall_db
    smooth_db = signal.lfilter([0.004], [1, 0.004 - 1], held_db)
    dipped = dry / amp(0.16 * smooth_db)
    heard = colour(dipped, [(1, 0)] + list(HOUSING) + [(SR, HOUSING[-1][1])])
    limited = 0.7 * np.tanh(heard / 0.7)
    lowpass = signal.firwin(511, EDGE_HZ, window=("kaiser", 9), fs=SR)
    return signal.oaconvolve(limited, lowpass[None], "same")


dry = scene()
out = record(dry)
inscribe(out)
```